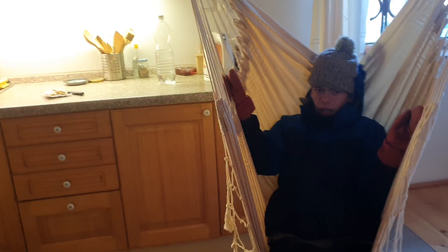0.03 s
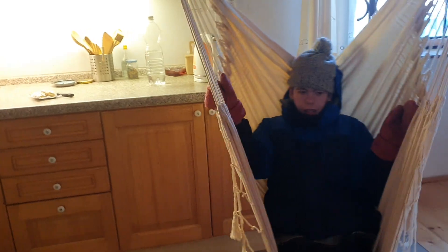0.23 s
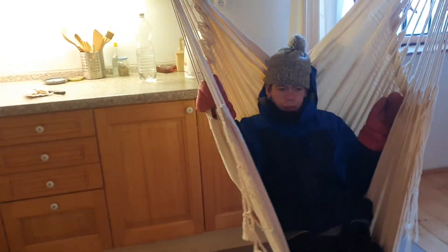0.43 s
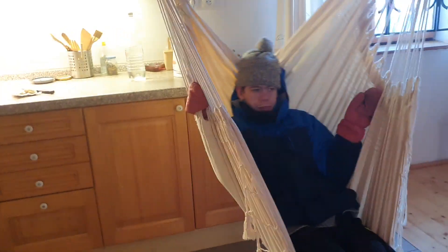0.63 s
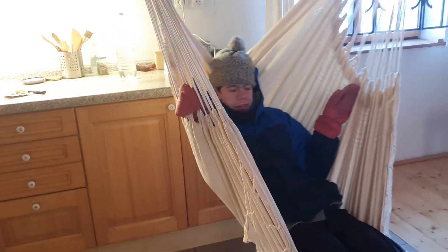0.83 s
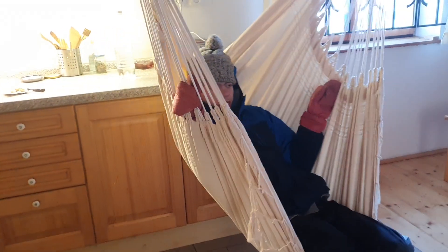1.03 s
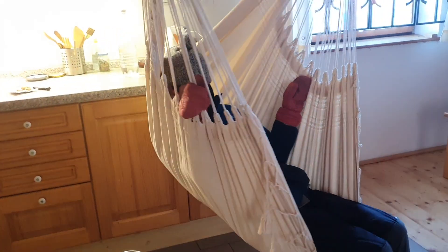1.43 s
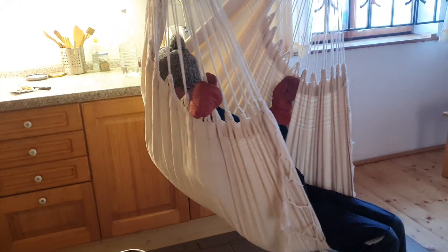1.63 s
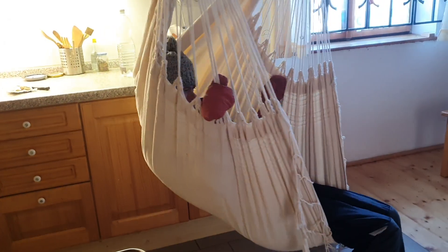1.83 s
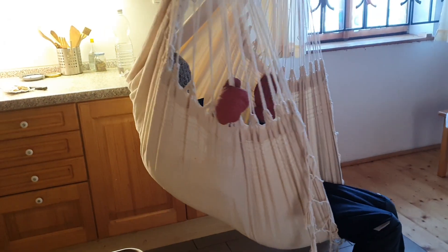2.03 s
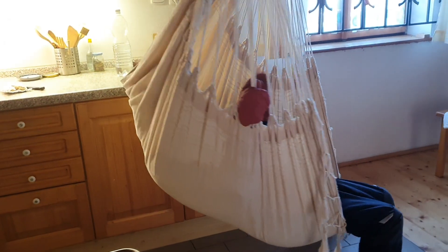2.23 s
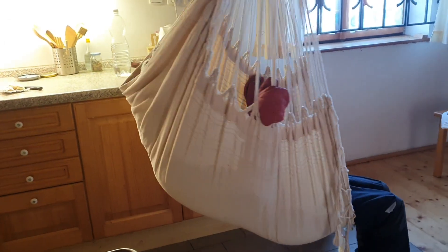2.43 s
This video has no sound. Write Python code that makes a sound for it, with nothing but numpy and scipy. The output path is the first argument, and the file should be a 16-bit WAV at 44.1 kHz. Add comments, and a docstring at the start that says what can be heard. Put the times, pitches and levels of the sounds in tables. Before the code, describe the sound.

A swinging hammock chair creaks and knocks on its hanger, to the left in a hard-walled kitchen. A creak and tiny rope squeak precede a sharp knock at 0.3 seconds. Another creak follows at 0.5, a second sharp knock near 1, and a dull knock with a creak at 1.4. Cloth rustles, gradually fading, and cords tick faintly at 2.4. Low microphone rumble with soft bumps runs underneath.

```python
"""A hammock chair's loaded ropes slip on the hanger as it swings and turns in a hard-walled kitchen.
Two sharp knocks and a dull one ring the hanger; runs of small slips make dull creaks.
A rope squeaks, cords tick and swish, and cloth fibres catch and rustle, all to the left.
The hand-held microphone adds low rumble, soft bumps and finger ticks over a faint noise floor."""
import sys
import numpy as np
from scipy import signal
from scipy.fft import rfft, irfft
from scipy.io import wavfile
from scipy.ndimage import uniform_filter1d

SR = 44100
rng = np.random.default_rng(int(sys.argv[2]) if len(sys.argv) > 2 else 0)


def pcm_store(signal):
    """Save signal as 16-bit PCM."""
    levels = np.round(np.clip(np.atleast_2d(signal), -1, 1) * 32767)
    wavfile.write(sys.argv[1], SR, levels.astype(np.int16).T)


N = 114660
T = np.arange(N) / SR

# Chair sound, left minus right: freq_hz, gain_db
LEFT_BIAS = [(100, -18), (380, 5), (700, 7), (1300, 9), (2400, 8), (4400, 13), (6500, 36), (9000, 5),
             (15000, 21)]


def from_db(db):
    """Decibels to gain."""
    return 10 ** (np.asarray(db) / 20)


def unit_rms(x):
    """Scale to rms 1."""
    return x / np.sqrt(np.mean(x ** 2) + 1e-20)


def envelope(rows):
    """Gain over time from rows of time_s, level_db."""
    return from_db(np.interp(T, *np.transpose(rows)))


def at_hz(rows, hz):
    """Interpolate a table over log frequency."""
    freqs_hz, values = np.transpose(rows)
    return np.interp(np.log(hz + 1e-9), np.log(freqs_hz), values)


def colour(x, spectrum):
    """Filter by rows of freq_hz, gain_db."""
    return irfft(rfft(x) * from_db(at_hz(spectrum, np.fft.rfftfreq(N, 1 / SR))), N)


def butter(x, hz, kind, order=2):
    """Butterworth filter."""
    return signal.sosfilt(signal.butter(order, hz, kind, fs=SR, output="sos"), x + 1e-18)


def pan(left_minus_right_db):
    """Left and right gains."""
    return from_db(np.array([[0.5], [-0.5]]) * left_minus_right_db)


def clicks(rows):
    """Impulses from rows of start_s, level_db."""
    start_s, level_db = np.transpose(rows)
    return np.bincount((start_s * SR).astype(int), from_db(level_db), N)[:N]


def grains(per_s, spread_db):
    """Random impulses of uneven size and sign."""
    hits = rng.random(N) < per_s / SR
    sizes = from_db(spread_db * np.clip(rng.standard_normal(N), -2, 2))
    return hits * sizes * rng.choice([-1, 1], N)


def ring(x, modes):
    """Drive damped modes with x."""
    out = 0
    for hz, gain_db, t60_s in modes:
        radius = from_db(-60 / (t60_s * SR))
        pole_real = radius * np.cos(2 * np.pi * hz / SR)
        mode = signal.lfilter([1, -pole_real], [1, -2 * pole_real, radius ** 2], x + 1e-18)
        out = out + from_db(gain_db) * mode
    return out


def noise_floor():
    """Faint steady noise, independent per side."""
    spectrum = [(100, 6), (500, 3), (1500, -1), (4000, -9), (6500, -10), (8500, 0), (15500, -1)]  # freq_hz, gain_db
    return from_db(-74) * unit_rms(colour(rng.standard_normal((2, N)), spectrum))


def rumble(levels, spectrum):
    """Low handling noise in mid and side, the mid's swells partly evened out."""
    side_vs_mid = [(25, 16.5), (70, -20.5), (130, -11.5), (250, -8), (600, -3.5)]  # freq_hz, gain_db
    mid, side = [unit_rms(colour(noise, spectrum)) for noise in rng.standard_normal((2, N))]
    local_power = uniform_filter1d(mid ** 2, size=2600)
    mid = unit_rms(mid / local_power ** 0.175)
    return envelope(levels) * (mid + colour(side, side_vs_mid) * [[1], [-1]])


def handling():
    """The hand on the microphone rumbles, sways and bumps; fingers tick on the housing's right."""
    # Grip rumble and deep sway. Levels: time_s, level_db. Spectra: freq_hz, gain_db
    grip_levels, grip_spectrum = [(0, -53), (.14, -55), (.2, -46), (.42, -48), (.58, -50.5), (.67, -55),
                                  (.78, -48), (.91, -54.5), (1.0, -50.5), (1.22, -46), (1.36, -51),
                                  (1.5, -50.5), (1.63, -51.5), (1.72, -49), (2.0, -48), (2.33, -49),
                                  (2.45, -53), (2.6, -52)], [(30, -31), (70, -9), (100, -8), (130, 4), (165, -4.5),
                                                  (210, -11.5), (260, -21), (400, -31.5), (700, -48),
                                                  (1500, -67)]
    sway_levels, sway_spectrum = [(0, -72), (.14, -57), (.23, -49), (.5, -49.5), (.66, -64), (.86, -59),
                                  (1.07, -53.5), (1.14, -69), (1.3, -70), (1.45, -55), (1.62, -61),
                                  (1.72, -57), (1.82, -62), (2.1, -69.5), (2.6, -64)], [(18, -24), (38, -16), (58, 9), (85, 12), (120, -8),
                                                (250, -46.5)]
    bumps = [(0.2469, -26.5, 119, 0.028), (.29, -37.5, 166.3, 0.038), (0.321, -32, 126, .035),
             (0.454, -36.5, 90.7, 0.046), (.946, -40.5, 130.7, 0.027), (1.419, -43.5, 88, 0.032),
             (1.713, -39.5, 107, 0.027)]  # start_s, level_db, pitch_hz, length_s
    finger_taps = [(.176, -54), (.191, -47), (.206, -57), (.222, -54), (1.021, -59), (1.06, -56)]  # start_s, level_db
    housing_modes = [(383, 1.5, 0.014), (640, -0.5, 0.0053), (907, -3.5, 0.036)]  # freq_hz, gain_db, t60_s
    grip = rumble(grip_levels, grip_spectrum)
    for start_s, level_db, pitch_hz, length_s in bumps:
        age_s = T - start_s
        arch = np.sin(np.pi * np.clip(age_s / length_s, 0, 1))
        grip = grip + from_db(level_db) * arch * np.sin(2 * np.pi * pitch_hz * age_s)
    ticks = ring(butter(clicks(finger_taps), 730, "low"), housing_modes)
    return grip * pan(3) + rumble(sway_levels, sway_spectrum) + ticks * pan(-10)


def kitchen_tail():
    """Stereo impulse response of hard walls: dense reflections dying band by band."""
    decay_times = [(200, .5), (530, 0.44), (1400, 0.4), (3700, 0.34), (10000, 0.32)]  # freq_hz, t60_s
    spectrum = [(150, 9.5), (500, 10.5), (850, 11.5), (1400, 5), (2700, 8), (4400, -4.5), (6500, 3.5),
                (12000, 16)]  # freq_hz, gain_db
    gap_s, build_s, coherent_below_hz = 0.00067, 0.002, 676
    t, tail = T[:SR * 3 // 4], 0
    edges_hz = np.geomspace(120, 17000, 15)
    for low_hz, high_hz in zip(edges_hz, edges_hz[1:]):
        hz = np.sqrt(low_hz * high_hz)
        t60_s = at_hz(decay_times, hz)
        left, independent = butter(rng.standard_normal((2, len(t))), [low_hz, high_hz], "band", order=3)
        coherence = 1 / (1 + (hz / coherent_below_hz) ** 2)
        right = coherence * left + np.sqrt(1 - coherence ** 2) * independent
        band = np.array([left, right * from_db(-at_hz(LEFT_BIAS, hz))])
        decay = from_db(-60 * t / t60_s) * np.sqrt(np.log(1e6) / (t60_s * SR))  # unit energy
        tail = tail + band * decay * from_db(at_hz(spectrum, hz))
    return tail * np.clip((t - gap_s) / build_s, 0, 1)


def kitchen(x):
    """Direct sound and first echoes, later and duller on the right, plus the tail."""
    echoes = [(.0078, -12), (.0095, -20.5), (.012, -10.5), (0.0204, -22)]  # near wall and ceiling: delay_s, gain_db
    right_lag_s, shadow_hz, shadow_db = 0.0001, 2200, -6.5
    direct = butter(butter(x, 700, "high", order=1), 9500, "low")
    early = sum(from_db(gain_db) * np.interp(T - delay_s, T, x) for delay_s, gain_db in echoes)
    left = from_db(3.5) * direct + early
    right = from_db(shadow_db) * butter(np.interp(T - right_lag_s, T, left), shadow_hz, "low", order=1)
    return np.array([left, right]) + signal.fftconvolve(x[None], kitchen_tail(), axes=1)[:, :N]


def fibre_friction(levels, spectrum):
    """Fibres catch and let go in soft noise, shaded on the right above the bass."""
    grain_share, flicker_db = 0.22, 0.04
    sides = []
    for _ in range(2):
        catches = np.sqrt(grain_share) * unit_rms(grains(per_s=1500, spread_db=3.5))
        hiss = np.sqrt(1 - grain_share) * rng.standard_normal(N)
        sides.append(unit_rms(colour(catches + hiss, spectrum)))
    left, right = sides
    right = colour(right, [(hz, -db) for hz, db in LEFT_BIAS])
    flicker = from_db(flicker_db * unit_rms(butter(rng.standard_normal(N), 19, "low")))
    return envelope(levels) * flicker * np.array([left, right])


def rustle():
    """Cloth rubs, hisses and groans under stretch; a sleeve sweeps over it; cords slide."""
    # Each pair: levels (time_s, level_db), spectrum (freq_hz, gain_db)
    rub_levels, rub_spectrum = [(0, -56), (.13, -60.5), (.22, -55.5), (.45, -58.5), (.58, -55),
                                (.72, -62.5), (.9, -65), (1.12, -70.5), (1.33, -64), (1.52, -72),
                                (1.62, -67), (1.70, -62.5), (1.83, -73.5), (2.0, -67.5), (2.15, -78),
                                (2.34, -74), (2.41, -73), (2.6, -80.5)], [(300, 1.5), (700, -0.5), (1400, -0.5), (2800, -1.5),
                                             (4200, -1.5), (6500, 0.5), (8500, -1), (15000, -3.5)]
    hiss_levels, hiss_spectrum = [(0, -61), (.45, -64), (.62, -58.5), (.74, -60), (.88, -78), (1.03, -63.5),
                                  (1.2, -59), (1.38, -67.5), (1.55, -78), (1.72, -91), (1.85, -88),
                                  (2.33, -80), (2.42, -70), (2.6, -80)], [(3000, -17.5), (6000, -3), (8000, 0), (11000, 8.5),
                                                (15500, -1.5)]
    sleeve_levels, sleeve_spectrum = [(0, -59), (.1, -63), (.22, -74), (.4, -100)], [(300, -14), (900, -10), (1800, -5.5), (3000, 3),
                                                     (5000, -4.5), (9000, -39)]
    cord_levels, cord_spectrum = [(2.28, -100), (2.39, -70.5), (2.5, -71.5), (2.6, -73.5)], [(3500, -25), (4400, -8), (5100, -1), (6200, -7),
                                                 (8000, -9), (9400, 5), (10600, -5), (15000, -13)]
    groan_levels, groan_spectrum = [(1.0, -97), (1.2, -76), (1.33, -62), (1.47, -59), (1.62, -72.5),
                                    (1.9, -105)], [(150, -9.5), (270, 5.5), (400, 6), (600, -4),
                                                   (1000, -39), (2500, -75)]
    return (fibre_friction(rub_levels, rub_spectrum)
            + fibre_friction(hiss_levels, hiss_spectrum)
            + fibre_friction(sleeve_levels, sleeve_spectrum)
            + fibre_friction(cord_levels, cord_spectrum)
            + fibre_friction(groan_levels, groan_spectrum))


def cord_tick():
    """The cords tick once with a short, high ring."""
    ticks = [(2.382, -62)]  # start_s, level_db
    cord_modes = [(4500, -9, 0.0054), (5360, -6, 0.0045), (6100, 5.5, .004), (9350, -2, .003)]  # freq_hz, gain_db, t60_s
    return ring(clicks(ticks), cord_modes)


def rope_squeak():
    """A tightening rope sings briefly, rising a little."""
    squeak = (.243, .035, 980, 70, -56)  # start_s, length_s, pitch_hz, rise_hz, level_db
    start_s, length_s, pitch_hz, rise_hz, level_db = squeak
    progress = np.clip((T - start_s) / length_s, 0, 1)
    phase = 2 * np.pi * np.cumsum(pitch_hz + rise_hz * progress) / SR
    return from_db(level_db) * np.sin(np.pi * progress) * np.sin(phase)


def hanger():
    """Double rope slips knock, runs of soft slips creak with a broad rasp; both ring the hanger."""
    knocks = [(0.3051, -19, 7900, 0.00068, -23), (0.9505, -22, 3700, 0.00059, -16),
              (1.4168, -39.5, 910, 0.0056, 6)]  # start_s, level_db, cutoff_hz, second_delay_s, second_gain_db
    creaks = [(0.231, 0.028, 0.024, 0.049, -44, 2600), (0.452, 0.02, 0.039, 0.068, -43, 1860),
              (1.415, 0.0035, 0.019, 0.046, -45.5, 1680), (1.66, 0.027, 0.017, 0.049, -64, 4500)]  # start_s, rise_s, hold_s, fall_s, level_db, cutoff_hz
    hanger_modes = [(330, -28, 0.016), (670, -32.5, 0.01), (1450, -19.5, 0.0068), (1650, -42, 0.01),
                    (2240, -30.5, 0.0064), (2900, -36, 0.0089), (3440, -17, 0.0028), (4230, -10.5, 0.0072),
                    (4700, -12.5, 0.002), (5620, -22, 0.014), (6300, -33, 0.0044)]  # freq_hz, gain_db, t60_s
    rasp_spectrum = [(150, -6.5), (350, 2.5), (600, 1.5), (1000, 1), (1600, 3), (2600, 5), (3600, 14),
                     (6000, -9)]  # freq_hz, gain_db
    creak_drive_db, crack_db = -13.5, -1
    blows, slips = 0, 0
    for start_s, level_db, cutoff_hz, second_delay_s, second_gain_db in knocks:
        pair = clicks([(start_s, level_db), (start_s + second_delay_s, level_db + second_gain_db)])
        blows = blows + butter(pair, cutoff_hz, "low", order=1)
    for start_s, rise_s, hold_s, fall_s, level_db, cutoff_hz in creaks:
        load = np.interp(T, start_s + np.cumsum([0, rise_s, hold_s, fall_s]), [0, 1, 1, 0])
        run = load * grains(per_s=1100, spread_db=5.5)
        slips = slips + from_db(level_db) * butter(run, cutoff_hz, "low")
    ringing = ring(blows + from_db(creak_drive_db) * slips, hanger_modes)
    return ringing + from_db(crack_db) * blows + colour(slips, rasp_spectrum)


def scene():
    """Hanger and ropes in the kitchen, plus rustle, noise floor and handling."""
    chair = kitchen(hanger() + rope_squeak() + cord_tick())
    return chair + rustle() + noise_floor() + handling()


def record(dry):
    """Microphone: a steep treble shelf, then a top cut."""
    shelf_hz, shelf_db, cutoff_hz = 6860, -11.5, 15900
    below = signal.sosfilt(signal.ellip(8, 0.5, 60, shelf_hz, fs=SR, output="sos"), dry)
    above = signal.sosfilt(signal.ellip(8, 0.5, 60, shelf_hz + 150, "high", fs=SR, output="sos"), dry)
    shelved = below + from_db(shelf_db) * above
    return signal.sosfilt(signal.ellip(10, 0.3, 70, cutoff_hz, fs=SR, output="sos"), shelved)


dry = scene()
out = record(dry)
pcm_store(out)
```